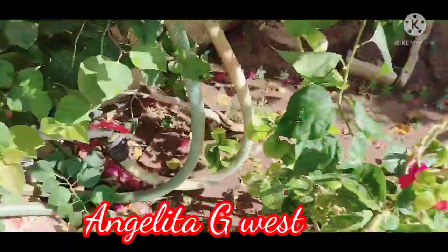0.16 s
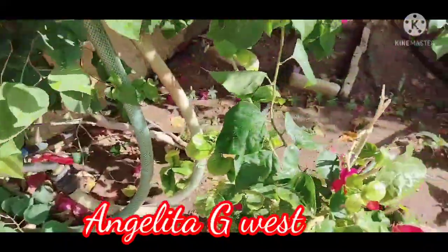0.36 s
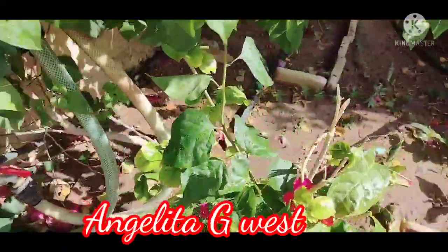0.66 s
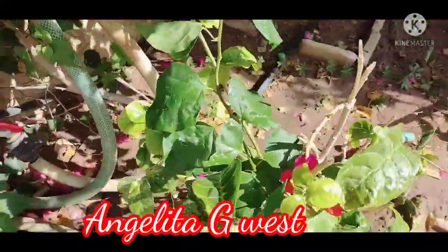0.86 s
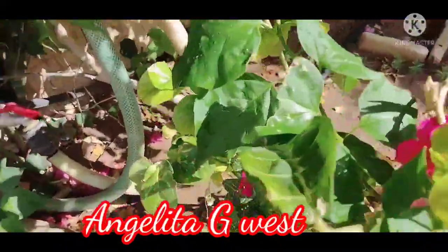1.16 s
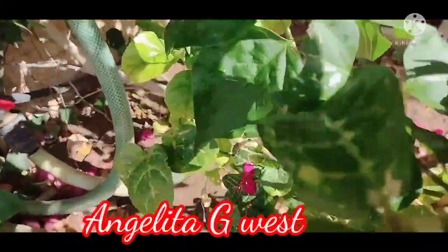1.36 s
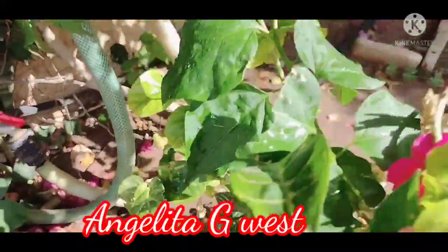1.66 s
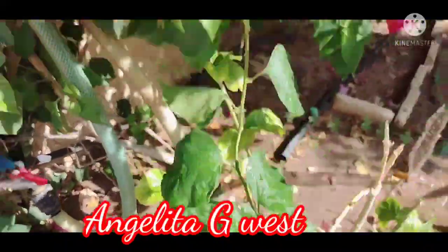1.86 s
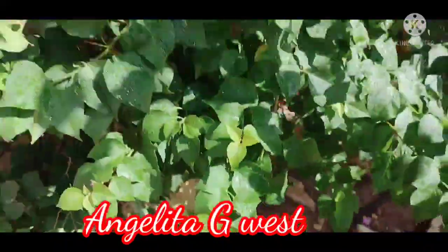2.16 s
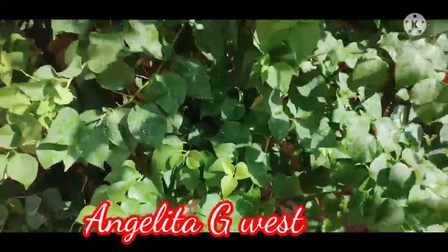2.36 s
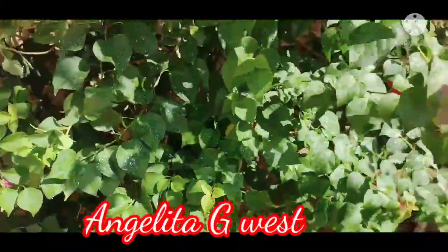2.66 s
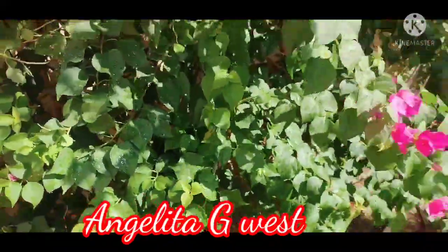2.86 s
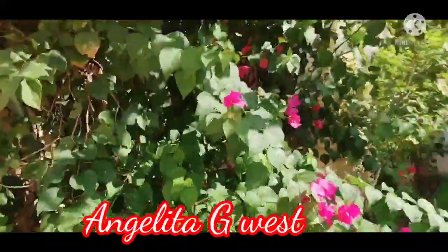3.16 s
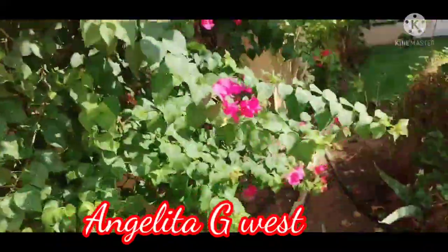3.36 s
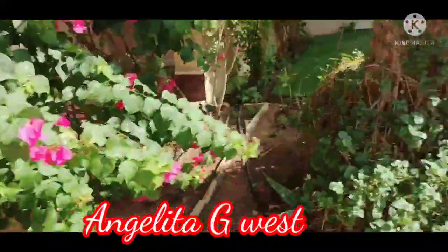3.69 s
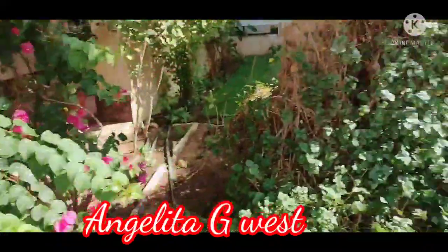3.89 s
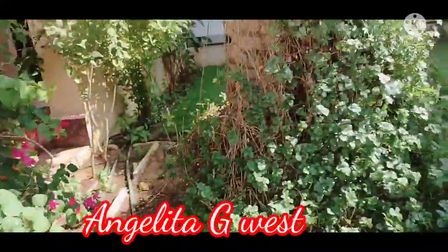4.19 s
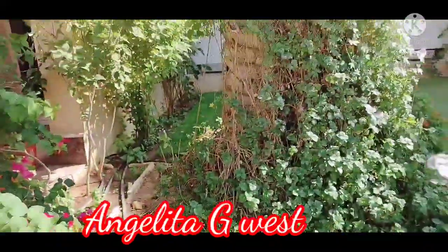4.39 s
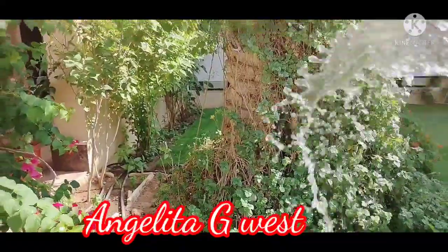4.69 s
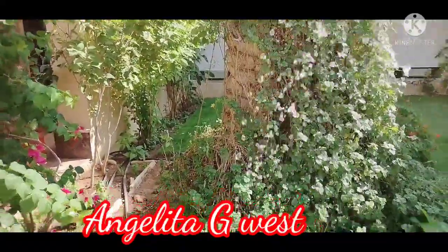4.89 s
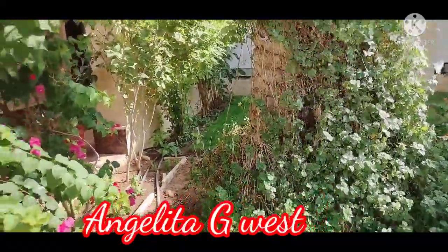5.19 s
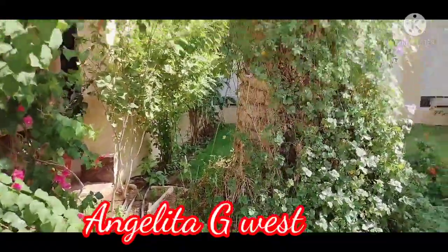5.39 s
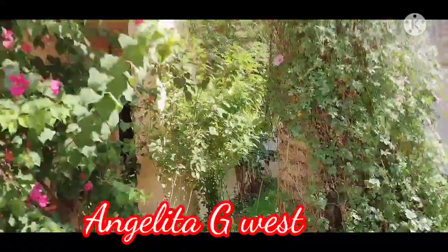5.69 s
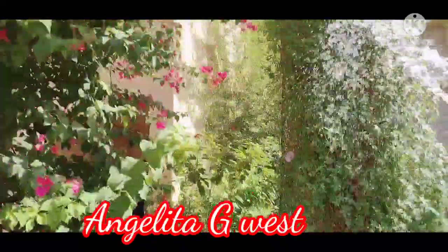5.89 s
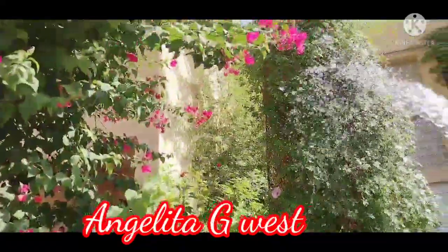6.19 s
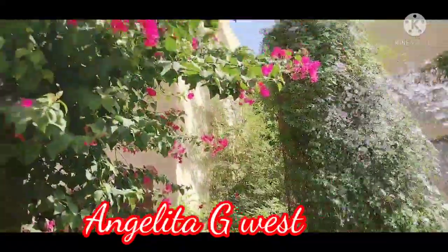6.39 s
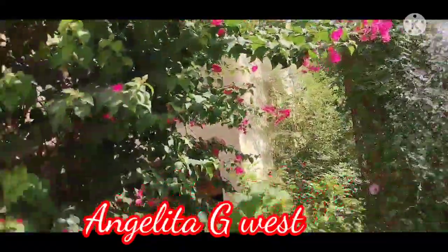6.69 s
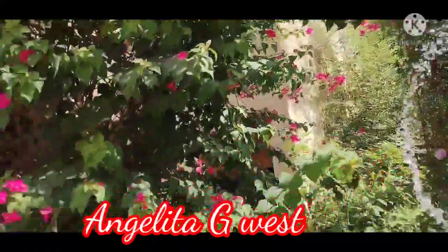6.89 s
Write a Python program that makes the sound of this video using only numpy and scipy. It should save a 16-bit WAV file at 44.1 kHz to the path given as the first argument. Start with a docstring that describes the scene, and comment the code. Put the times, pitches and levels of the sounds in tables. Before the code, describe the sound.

Outdoors in a garden, a faint squeaky slide and several dry knocks sound close to the microphone. Hose water then begins spitting onto nearby leaves, growing into a bright hiss with dense crackling splats and patter, over dull drumming on soil. The jet is strongest around the middle, then moves to a farther creeper, thinning to soft spray and sparse high ticks over a low outdoor rumble.

```python
"""Garden hose on shrubs

A hose is swept over shrubs: filtered random droplets hiss as fine spray and patter on leaves.
Slugs of water splat on near leaves as band-passed bursts; then the jet moves on to a creeper farther off.
At first something slides briefly (squealing resonances) and knocks a few times close by (filtered blows).
Low outdoor rumble, distant air and a faint hum (noise and wavering sines) lie underneath; a low drone joins late.
"""
import sys
import numpy as np
from scipy import signal
from scipy.fft import rfft, irfft, next_fast_len
from scipy.io import wavfile
from scipy.ndimage import map_coordinates

SR = 44100
rng = np.random.default_rng(int(sys.argv[2]) if len(sys.argv) > 2 else 0)


def transcribe(signal):
    """Save signal, clipped to [-1, 1], as a 16-bit WAV file at the path in sys.argv[1]."""
    frames = np.atleast_2d(signal).T
    limited = np.clip(frames, -1, 1)
    pcm = np.round(limited * 32767).astype(np.int16)
    wavfile.write(sys.argv[1], SR, pcm)


N = 310905
TIME = np.arange(N) / SR
CUTOFF_HZ = 15600


def from_db(db):
    """Decibels to gain."""
    return 10 ** (np.asarray(db) / 20)


def rms_one(x):
    """Scale to rms 1."""
    return x / np.sqrt(np.mean(x ** 2) + 1e-20)


def level_curve(rows):
    """Interpolate (t/s, level/dB) rows to every sample."""
    t_s, level_db = np.transpose(rows)
    return np.interp(TIME, t_s, level_db)


def noise():
    """White noise, rms 1."""
    return rng.standard_normal(N)


def sine(hz, phase=0):
    """Steady sine with an optional phase offset in rad."""
    return np.sin(2 * np.pi * hz * TIME + phase)


def drift(rate_hz):
    """Slow random curve of rms 1: noise through two equal one-pole low-passes, run at SR / 40."""
    step = 40
    r = np.exp(-2 * np.pi * rate_hz * step / SR)
    slow = signal.lfilter([1], [1, -2 * r, r * r], rng.standard_normal(N // step + 2002))
    slow = rms_one(slow[2000:])  # settled part
    return np.interp(np.arange(N) / step, np.arange(len(slow)), slow)


def coloured(x, spectrum):
    """Minimum-phase filter with the given relative spectrum; white input keeps its power."""
    size = 2 * next_fast_len(N // 2 + SR // 4)
    hz, db = np.transpose(spectrum)
    octave = np.log2(np.maximum(np.fft.rfftfreq(size, 1 / SR), 1))
    outside = np.abs(octave - np.clip(octave, np.log2(hz[0]), np.log2(hz[-1])))
    curve_db = np.interp(octave, np.log2(hz), db) - 18 * outside  # 18 dB/octave skirts
    gain = rms_one(from_db(curve_db))
    cepstrum = irfft(np.log(gain + 1e-6))
    cepstrum[1:size // 2] *= 2  # fold to causal
    cepstrum[size // 2 + 1:] = 0
    return irfft(rfft(x, size) * np.exp(rfft(cepstrum)))[:N]


def resonance(x, hz, width_hz):
    """Two-pole resonance; white input keeps its power."""
    r = np.exp(-np.pi * width_hz / SR)
    poles = [1, -2 * r * np.cos(2 * np.pi * hz / SR), r * r]
    return np.sqrt((1 - r * r) / 2) * signal.lfilter([1, 0, -1], poles, x + 1e-18)


def droplets(per_s, spread_db):
    """Random clicks, rms 1: many small, few large (negative spread: many large, few small)."""
    sizes = from_db(spread_db * np.minimum(rng.exponential(1, N), 3))
    hits = rng.random(N) < per_s / SR
    return rms_one(hits * sizes * rng.choice([-1, 1], N))


def clumps(per_s, spread_db, decay_s, steady):
    """Envelope of a jet in clumps: each lands at once and dies away, over a steady power share; rms 1."""
    hits = droplets(per_s, spread_db) ** 2
    power = signal.lfilter([1], [1, -np.exp(-2 / (decay_s * SR))], hits + 1e-18)
    steady = np.clip(steady, 0, 1)
    return np.sqrt(steady + (1 - steady) * power / power.mean())


def burst(age, decay_s, crack_db, crack_s):
    """Impact envelope: fast rise, short crack, slower decay."""
    body = np.exp(-age / max(decay_s, 1e-3))
    crack = from_db(crack_db) * np.exp(-age / crack_s)
    return (body + crack) * (1 - np.exp(-age / 0.00021))


def add(track, t_s, sound):
    """Mix a sound into a track at t_s."""
    at = max(round(t_s * SR), 0)
    track[at:at + len(sound)] += sound[:N - at]


def blend(far, near, nearness):
    """Equal-power cross-fade."""
    return np.sqrt(1 - nearness) * far + np.sqrt(nearness) * near


def speckled(x, speckle_db, rate_hz, count=11):
    """Splashing drops differ in size, so bands of the splash swell separately; rms 1."""
    edges_hz, out = np.geomspace(2200, 16000, count + 1), 0
    for k, band in enumerate(zip(edges_hz, edges_hz[1:])):
        part = signal.sosfilt(signal.butter(2, band, "band", fs=SR, output="sos"), x)
        out = out + (-1) ** k * part * from_db(speckle_db * drift(rate_hz))  # alternate polarity
    return rms_one(out)


# outdoor rumble before gain: t/s, level/dB
RUMBLE_LEVEL = [(0.0, -41.5), (0.35, -39.5), (0.41, -42), (1.33, -41.5), (1.98, -32), (2.04, -38.5),
                (2.92, -48.5), (4.16, -36.5), (4.22, -43.5), (5.32, -42.5), (5.73, -47), (7.05, -42)]
# rumble spectrum: f/Hz, relative density/dB
RUMBLE_SPECTRUM = [(11, -47), (18, 0.5), (76, 3), (124, -3.5), (171, -21.5), (220, -14.5), (290, -24),
                   (480, -120)]
RUMBLE_GAIN_DB = -3.5


def rumble():
    """Low-passed noise following a level curve."""
    return from_db(level_curve(RUMBLE_LEVEL) + RUMBLE_GAIN_DB) * coloured(noise(), RUMBLE_SPECTRUM)


# distant air spectrum: f/Hz, relative density/dB
AIR_SPECTRUM = [(82, -18.5), (140, 1), (210, -4.5), (384, -12.5), (477, -24.5), (705, -19), (2370, -34),
                (3500, -59), (4550, -63), (7700, -120)]
AIR_DB, AIR_WAVER_DB = -54, 2.1


def distant_air():
    """Coloured noise that swells and dips at random."""
    return from_db(AIR_DB + AIR_WAVER_DB * drift(4.4)) * coloured(noise(), AIR_SPECTRUM)


# faint far hum, mid-scene: f/Hz, level/dB
HUM_TONES = [(86, -79), (131, -59), (242, -67), (385, -65.5)]
HUM_WAVER_DB, HUM_RISE_DB_PER_S = 3, 0.57


def hum():
    """Sines wavering in level and phase, slowly growing."""
    total = np.zeros(N)
    rise_db = HUM_RISE_DB_PER_S * (TIME - TIME.mean())
    for hz, level_db in HUM_TONES:
        level = from_db(level_db + rise_db + HUM_WAVER_DB * drift(0.5))
        total += level * sine(hz, 1.21 * drift(0.92))
    return total


DRONE_S, DRONE_RISE_S, DRONE_HZ, DRONE_DB = 6.47, 0.12, 128.1, -48


def drone():
    """Late, far-off low sine with wandering phase."""
    fade_in = np.clip((TIME - DRONE_S) / DRONE_RISE_S, 0, 1)
    return from_db(DRONE_DB) * fade_in * sine(DRONE_HZ, 0.57 * drift(2.9))


# slide resonances before the pitch bend: f/Hz, width/Hz, relative level/dB
SLIDE_RESONANCES = [(1035, 50, -5), (1470, 50, -8), (1690, 61, -5), (2060, 80, -9), (2750, 360, 2),
                    (4500, 400, -9)]
SLIDE_DB, SLIDE_FADE_DB_PER_S = -56.5, 47
SLIDE_TOP_S, SLIDE_RISE_PER_S, SLIDE_SAG_PER_S = 0.023, 1.24, 0.4  # log-pitch slopes around the top
FRICTION_DB = 1.5  # ringing friction relative to squeal
SQUEAL_END_S, SQUEAL_RELEASE_S = .21, .14  # squeal dies before friction; times before the bend


def slide():
    """Friction makes narrow resonances squeal; pitch rises for a moment, then sags as the stroke slows."""
    bend = np.minimum(SLIDE_RISE_PER_S * (TIME - SLIDE_TOP_S), SLIDE_SAG_PER_S * (SLIDE_TOP_S - TIME))
    ratio = np.exp(bend + 0.0034 * drift(13))
    friction = noise()
    ringing, squeal = np.zeros((2, N))
    for hz, width_hz, db in SLIDE_RESONANCES:
        ringing += from_db(db) * resonance(friction, hz, width_hz)
        squeal += from_db(db + 2 * drift(14)) * sine(hz, .5 * drift(25))
    squeal_fade = np.clip((SQUEAL_END_S - TIME) / SQUEAL_RELEASE_S, 0, 1)
    unbent = rms_one(squeal) * squeal_fade + from_db(FRICTION_DB) * rms_one(ringing)
    stroke = map_coordinates(unbent, [np.cumsum(ratio)], order=1)  # variable-speed read
    return from_db(SLIDE_DB - SLIDE_FADE_DB_PER_S * TIME) * stroke


# knocks and scuffs close by: t/s, level/dB, contact cut-off f/Hz, rub decay/s
KNOCK_EVENTS = [(0.259, -40, 1890, 0.0038), (0.281, -49, 1900, 0.03), (0.33, -47.5, 2400, 0.019),
                (0.474, -30, 1400, 0.0011), (0.481, -30.5, 1420, 0.0024), (0.514, -41.5, 2100, 0.0056),
                (0.661, -34.5, 1030, 0.012), (0.728, -43.5, 3320, 0.013), (0.7484, -27, 2190, 0.004),
                (1.0506, -37, 2100, 0.0053), (1.0605, -38.5, 7040, 0.0053), (1.0627, -41, 6000, 0.0048),
                (1.076, -43.5, 3000, 0.023), (1.0841, -17.5, 3700, 0.0019), (1.421, -44, 1940, 0.0027)]
# knocked body spectrum: f/Hz, relative density/dB
KNOCK_BODY_SPECTRUM = [(300, 4), (600, 1), (800, -0.5), (1100, 4.5), (1380, 9), (1900, 7), (2800, 6.5),
                       (3600, 1.5), (5000, 0), (6200, 5.5)]
# bright scuffing edge spectrum: f/Hz, relative density/dB
KNOCK_EDGE_SPECTRUM = [(3000, -6), (5500, -12.5), (7500, -9), (8500, -5.5), (9400, -6), (10100, 1),
                       (11000, -5), (12500, -11), (15500, -19)]
EDGE_DB, EDGE_AT_HZ, EDGE_DB_PER_OCTAVE = -2.5, 3600, 8  # harder contact, stronger edge
RUB_RISE_S = 0.00063


def knocks():
    """Dry blows: a crack and a brief rub, duller for a soft contact, with a bright scuffing edge."""
    age = TIME[:SR // 10]
    force, edge = np.zeros((2, N))
    crack = from_db(14.5) * signal.unit_impulse(len(age))
    for t_s, body_db, contact_hz, decay_s in KNOCK_EVENTS:
        rub = rng.standard_normal(len(age)) * np.exp(-age / decay_s) * (1 - np.exp(-age / RUB_RISE_S))
        blow = signal.lfilter(*signal.butter(3, contact_hz, fs=SR), rub + crack)
        add(force, t_s + 0.00036, from_db(body_db) * blow)
        edge_db = body_db + EDGE_DB + EDGE_DB_PER_OCTAVE * np.log2(contact_hz / EDGE_AT_HZ)
        add(edge, t_s, from_db(edge_db) * burst(age, decay_s * 1.78, crack_db=-19.0, crack_s=0.00049))
    return coloured(force, KNOCK_BODY_SPECTRUM) + coloured(edge * noise(), KNOCK_EDGE_SPECTRUM)


# hollow bumps, all but the last under the knocks: t/s, initial f/Hz, level/dB, decay/s
BUMP_EVENTS = [(0.48, 990, -38, 0.0039), (0.514, 614, -46, 0.005), (0.73, 400, -46, 0.0071),
               (0.749, 388, -30, 0.0033), (1.051, 380, -33, 0.004), (1.0848, 383, -20, 0.0026),
               (2.612, 231, -30, 0.02)]
BUMP_SAG_PER_S = 8.5


def bumps():
    """Soft decaying sines; pitch sinks as the contact relaxes."""
    total = np.zeros(N)
    for t_s, hz, level_db, decay_s in BUMP_EVENTS:
        age = np.maximum(TIME - t_s, 0)
        cycles = hz * (1 - np.exp(-BUMP_SAG_PER_S * age)) / BUMP_SAG_PER_S
        envelope = np.exp(-age / decay_s) * (1 - np.exp(-age / 0.00065))
        total += from_db(level_db) * np.sin(2 * np.pi * cycles) * envelope
    return total


# water drumming on soil before gain: t/s, level/dB
SOIL_LEVEL = [(0.0, -55.5), (0.7, -59.5), (1.8, -54.5), (2.35, -58), (2.83, -49), (3.3, -55.5),
              (3.73, -53.5), (5.5, -57), (7.05, -53.5)]
# soil spectrum: f/Hz, relative density/dB
SOIL_SPECTRUM = [(190, -15.5), (270, 5.5), (420, 4.5), (650, -2), (800, -5.5), (1000, -8.5), (1600, -13.5)]
SOIL_GAIN_DB = -0.5


def soil(landing):
    """Dull droplets on soil, partly following the clumps of the jet."""
    drumming = coloured(droplets(per_s=2500, spread_db=-3.5), SOIL_SPECTRUM)
    return from_db(level_curve(SOIL_LEVEL) + SOIL_GAIN_DB) * drumming * np.sqrt(landing)


# fine spray of the wandering jet before surges and gain: t/s, level/dB
JET_LEVEL = [(0.0, -59), (0.31, -69.5), (0.45, -69), (1.45, -55.5), (1.67, -47.5), (1.92, -46.5),
             (2.32, -45), (2.55, -41.5), (3.1, -39), (3.22, -37), (3.59, -39), (3.83, -31.5), (4.83, -35),
             (5.03, -40), (5.46, -47.5), (5.79, -47.5), (6.34, -43), (7.05, -49.5)]
# swell on a bunch of leaves, or thinning in a gap: t/s, length/s, spray change/dB, patter change/dB
JET_SURGES = [(0.265, 0.28, 11.5, 19), (0.56, 0.043, 7, -7), (0.64, 0.31, 7, 9), (1.475, 0.21, -7.5, -5),
              (1.75, 0.13, 4, 11.5), (1.876, 0.14, 7, 14), (2.035, 0.031, -4, 5.5),
              (2.217, 0.092, -1.5, -7), (2.686, 0.075, 5, 12), (2.977, 0.063, -0.5, 8),
              (3.048, 0.047, -2, 2.5), (3.104, 0.41, 2, 2), (3.433, 0.12, -2.5, -4.5), (3.59, 0.11, 1.5, 5),
              (3.715, 0.023, -0.5, 0), (4.201, 0.046, -1.5, 7.5), (4.377, 0.12, 4, 3.5),
              (4.545, 0.088, 1.5, -2.5), (4.633, 0.056, 3.5, 1), (4.882, 0.12, 6.5, 9),
              (5.015, 0.071, -0.5, 3), (5.252, 0.11, 5, 4), (5.45, 0.46, -2, -21)]
SURGE_ATTACK_S, SURGE_RELEASE_S = .012, .018
SPRAY_GAIN_DB = -0.14
PATTER_DB, DRIP_DB = -13, -64  # patter re spray curve; wet leaves drip on at their own level


def jet():
    """Spray and patter levels in dB: patter follows spray, each with its own surge depth."""
    spray_db = level_curve(JET_LEVEL)
    patter_db = spray_db + PATTER_DB
    for t_s, length_s, spray_lift_db, patter_lift_db in JET_SURGES:
        attack = (TIME - t_s) / SURGE_ATTACK_S
        release = 1 + (t_s + length_s - TIME) / SURGE_RELEASE_S
        swell = np.clip(np.minimum(attack, release), 0, 1)
        spray_db = spray_db + spray_lift_db * swell
        patter_db = patter_db + patter_lift_db * swell
    with_drip = np.hypot(from_db(patter_db), from_db(DRIP_DB))
    return spray_db + SPRAY_GAIN_DB, 20 * np.log10(with_drip)


# far spray spectrum: f/Hz, relative density/dB
FAR_SPRAY_SPECTRUM = [(1760, -69), (3000, -58), (3490, -10), (6090, -6.5), (10200, 8), (11400, 7),
                      (14900, -5), (15500, 2)]
# splash spectrum, near spray and slugs: f/Hz, relative density/dB
SPLASH_SPECTRUM = [(1760, -32.5), (3000, -14), (5880, -6.5), (10500, 4.5), (14900, -8), (15500, -5.5)]


def spray(spray_db, landing, nearness):
    """Tiny droplets on foliage: far off they merge to a hiss, near by they crackle in clumps."""
    far_clumps = clumps(per_s=2300, spread_db=-21.0, decay_s=0.0043, steady=0.27)
    far_hiss = coloured(droplets(per_s=16000, spread_db=1.5) * far_clumps, FAR_SPRAY_SPECTRUM)
    crackle = coloured(droplets(per_s=12000, spread_db=5.0) * landing, SPLASH_SPECTRUM)
    far = speckled(far_hiss, speckle_db=2.0, rate_hz=55)
    near = speckled(crackle, speckle_db=3.5, rate_hz=30)
    return from_db(spray_db) * blend(far, near, nearness)


# leaf tap spectrum, filters the ringing leaves: f/Hz, relative gain/dB
PATTER_SPECTRUM = [(250, 25), (600, -27.5), (1000, -2), (1600, 0), (3000, 1), (5000, 1), (8000, -2),
                   (13000, -9)]
LEAF_SWELL_DB = 3.5  # jet wanders from leaf to leaf


def leaf_taps(per_s, spread_db, width_share, count=30):
    """Drops dealt to leaves of many pitches; each rings a few cycles and swells separately; rms 1."""
    clicks, leaf = droplets(per_s, spread_db), rng.integers(0, count, N)
    taps = np.zeros(N)
    for k, hz in enumerate(np.geomspace(800, 9000, count)):
        ringing = resonance(clicks * (leaf == k), hz, hz * width_share)
        taps += np.sqrt(hz) * ringing * from_db(LEAF_SWELL_DB * drift(9.3))
    return rms_one(coloured(taps, PATTER_SPECTRUM))


NEAR_TAPS_DB = -0.5  # re patter


def patter(patter_db, landing, nearness):
    """Larger drops: dry taps in clumps on near leaves, an even wash on far ones."""
    taps = leaf_taps(per_s=2600, spread_db=4.5, width_share=0.055) * landing
    wash = leaf_taps(per_s=9000, spread_db=3.5, width_share=0.16)
    return from_db(patter_db) * blend(wash, from_db(NEAR_TAPS_DB) * taps, nearness)


SPRINKLE_S, SPRINKLE_LENGTH_S, SPRINKLE_PER_S = 5.42, .52, 72
SPRINKLE_DB, SPRINKLE_SPREAD_DB = -45.5, 11.5  # slap before SLAP_DB
SPRINKLE_SPLASH_DB = -6  # splash re slap, before gains
SPRINKLE_HZ, SPRINKLE_OCTAVES, SPRINKLE_DECAY_S = 10300, 0.13, 0.0027


def sprinkle():
    """In the lull, single drops tick high and thin on the far creeper; rows as in SLUGS."""
    when, size, pitch = rng.random((int(SPRINKLE_PER_S * SPRINKLE_LENGTH_S), 3)).T
    t_s = SPRINKLE_S + SPRINKLE_LENGTH_S * when
    slap_db = SPRINKLE_DB + SPRINKLE_SPREAD_DB * (2 * size - 1)
    hz = np.minimum(SPRINKLE_HZ * 2 ** (SPRINKLE_OCTAVES * (2 * pitch - 1)), CUTOFF_HZ)
    decay_s = np.full(len(hz), SPRINKLE_DECAY_S)
    return np.transpose([t_s, slap_db + SPRINKLE_SPLASH_DB, slap_db, hz, decay_s])


STRAYS_PER_S, STRAY_SPREAD_DB = 45, 4.5  # candidate rate; kept by nearness
STRAY_PEAK_DB, STRAY_SLAP_DB = 8, -11.5  # re spray, before gains
STRAY_HZ, STRAY_OCTAVES, STRAY_DECAY_S = 3800, 1.3, 0.0027


def strays(spray_db, nearness):
    """Small slugs break off at random, more while the jet lands near, scaled to the spray; rows as in SLUGS."""
    when, luck, size, slap, pitch = rng.random((int(STRAYS_PER_S * N / SR), 5)).T
    at = (when * N).astype(int)
    level_db = spray_db[at] + STRAY_SPREAD_DB * (2 * size - 1)
    slap_db = level_db + STRAY_SLAP_DB + STRAY_SPREAD_DB * (2 * slap - 1)
    hz = STRAY_HZ * 2 ** (STRAY_OCTAVES * (2 * pitch - 1))
    decay_s = np.full(len(at), STRAY_DECAY_S)
    rows = np.transpose([TIME[at], level_db + STRAY_PEAK_DB, slap_db, hz, decay_s])
    return rows[luck < nearness[at]]


GAP_S, GAP_FROM_DB = 0.054, -11
GAP_DEEPENS = 0.57  # dB of dip per dB of slug above GAP_FROM_DB


def gaps():
    """Water gathers into each large slug, so the jet thins just before it lands; change in dB."""
    age = TIME[:SR // 20]
    dip = np.clip(np.minimum(2 * age / GAP_S, 1 + (GAP_S - age) / 0.0063), 0, 1)
    thinning_db = np.zeros(N)
    for t_s, peak_db, *_ in SLUGS:
        add(thinning_db, t_s - GAP_S, GAP_DEEPENS * max(peak_db - GAP_FROM_DB, 0) * dip)
    return -thinning_db


# slugs hitting leaves, levels before gains: t/s, splash level/dB, slap level/dB, leaf f/Hz, decay/s
SLUGS = [(1.29, -43, -46, 6950, .008), (1.632, -29.5, -45.5, 2280, 0.011), (1.766, -39, -42, 1900, .005),
         (1.812, -20, -50, 4600, .003), (1.814, -10.5, -42, 4680, 0.0068), (1.860, -26, -34, 4530, 0.0065),
         (1.893, -17, -40, 2460, 0.0062), (1.945, -23, -35.5, 2170, 0.0042),
         (1.977, -18.5, -36, 4500, 0.0038), (1.993, -11.5, -54, 6000, 0.00091),
         (2.327, -40, -43, 3930, .004), (2.348, -16, -53, 6900, 0.00086), (2.354, -17, -45, 3000, 0.0044),
         (2.370, -21, -48, 1900, 0.0033), (2.4071, -21, -37.5, 2780, 0.0077),
         (2.4412, -18.5, -33, 6000, 0.0044), (2.4527, -15.5, -31.5, 2950, 0.0051),
         (2.4795, -8.5, -37, 2320, 0.0029), (2.4998, -20, -28.5, 5260, 0.0067),
         (2.5506, -17.5, -34.5, 3880, 0.017), (2.605, -24, -33.5, 2650, 0.0042),
         (2.683, -29, -38.5, 7000, .003), (2.6922, -13, -28.5, 2980, 0.013), (2.72, -27, -32, 3020, 0.0036),
         (2.734, -10.5, -29.5, 3270, 0.014), (2.766, -18, -50, 5000, 0.011),
         (2.797, -14, -41, 2820, 0.0051), (2.8225, -16, -43, 4000, 0.0011),
         (2.8469, -15.5, -52, 4230, 0.0073), (2.8651, -12, -33, 4200, 0.0076),
         (2.9557, -10.5, -36.5, 2400, 0.0057), (2.9999, -12, -31, 3280, 0.015),
         (3.112, -17.5, -39, 4800, .008), (3.139, -13.5, -39, 3600, 0.0041), (3.15, -34, -34, 2580, 0.0061),
         (3.165, -16, -38, 3600, 0.0043), (3.1913, -17, -29, 2930, 0.0073),
         (3.2033, -14, -24.5, 2750, 0.0087), (3.2492, -17.5, -37, 3580, 0.014),
         (3.293, -13.5, -41, 4500, 0.0036), (3.330, -16, -38, 4000, 0.0038),
         (3.348, -16, -34, 4480, 0.0022), (3.363, -27, -32, 3100, 0.0037),
         (3.381, -8.5, -44.5, 7000, 0.0012), (3.402, -14.5, -31, 3540, .005),
         (3.409, -15, -41, 3940, 0.014), (3.525, -14.5, -38, 4400, 0.0054),
         (3.5623, -15.5, -38, 4500, 0.0053), (3.591, -16.5, -36, 3840, 0.018),
         (3.618, -17, -24.5, 2740, 0.004), (3.6425, -19, -22.5, 3020, 0.004),
         (3.649, -19, -28, 2740, 0.0037), (3.6649, -13, -25, 2300, 0.0058),
         (3.673, -11.5, -30.5, 2480, 0.0043), (3.6886, -13.5, -29, 3800, 0.013),
         (3.7527, -15, -31.5, 3820, 0.022), (3.781, -9.5, -25.5, 5850, 0.0021),
         (3.801, -23.5, -30, 3800, 0.013), (3.853, -17, -53.5, 4500, 0.0049),
         (3.886, -7, -47, 6050, 0.00081), (3.9156, -17.5, -37, 3530, 0.0053), (3.953, -14, -43, 6500, 0.01),
         (4.032, -17, -29.5, 3070, 0.0024), (4.04, -11.5, -29, 2900, 0.0073),
         (4.067, -10.5, -37, 4360, 0.0047), (4.2138, -16, -33, 1720, 0.0061),
         (4.217, -17.5, -28, 4460, 0.0048), (4.236, -16, -31.5, 4570, 0.0044),
         (4.261, -12, -44.5, 5000, 0.0016), (4.2823, -6, -41, 4630, 0.00094),
         (4.3157, -9, -28, 5900, 0.0027), (4.357, -2.5, -28, 1740, 0.002), (4.369, -12, -34, 1780, .003),
         (4.3669, -9.5, -29.5, 4830, 0.0031), (4.399, -17.5, -26, 5180, 0.003),
         (4.423, -17, -30, 4800, 0.011), (4.533, -15, -33, 3800, 0.0013), (4.674, -22, -30, 2930, 0.0065),
         (4.694, -15, -29.5, 3360, 0.0037), (4.707, -11, -33, 3400, 0.0022), (4.734, -13, -33, 3856, 0.011),
         (4.786, -15.5, -27, 7000, 0.0042), (4.7945, -13, -44, 4870, 0.0042),
         (4.8172, -12, -36, 2840, 0.0028), (4.830, -10, -39.5, 3480, .003),
         (4.863, -10.5, -50, 5000, 0.0015), (4.885, -15, -30, 2130, .005), (4.900, -18, -30, 4360, 0.0046),
         (4.94, -6.5, -32, 4380, 0.002), (4.9618, -11.5, -24.5, 4570, 0.0041),
         (4.996, -12, -37, 3800, 0.0025), (5.126, -23, -52.5, 6000, 0.0049), (5.546, -28, -46, 5920, .003),
         (5.6049, -27, -43, 5600, 0.0019), (5.672, -35, -47.5, 5920, 0.003),
         (5.706, -41.5, -40.5, 8050, 0.0048), (5.755, -29.5, -52, 6000, 0.003),
         (5.874, -16.5, -45, 4680, 0.0012), (6.205, -40, -37, 7500, 0.0067)]
SHOWER_DB, SLAP_DB = -10, -8.5  # gains
CRACK_DB = 20  # first touch re rush
REBOUND, REBOUND_S = 0.36, .0013  # share, mean delay
SLAP_WIDTH_HZ = 2760  # at STRAY_HZ; grows as sqrt(f), at most 0.9 f
RING_DB, RING_WIDTH_SHARE = -7.5, .09
FLAP_DB, FLAP_HZ = 2.5, 990  # low-passed push
PLIP_DB, PLIP_OCTAVES = -7, 0.63  # drops after a slug: level re table slap, pitch spread


def splats(slugs, count=4):
    """A slug cracks on a leaf, whose rebound bands the sound; drops follow, and all bursts into a shower."""
    age = TIME[:SR // 16]
    shower_power, slaps, flaps = np.zeros((3, N))
    grit = coloured(droplets(per_s=13000, spread_db=-3.5), SPLASH_SPECTRUM)
    grit = speckled(grit, speckle_db=1.0, rate_hz=27)
    crack = from_db(CRACK_DB) * signal.unit_impulse(len(age))
    for t_s, peak_db, slap_db, hz, decay_s in slugs:
        splash = from_db(peak_db + SHOWER_DB) * burst(age, decay_s, crack_db=-7.0, crack_s=0.00013)
        add(shower_power, t_s, splash ** 2)

        rush = rng.standard_normal(len(age)) * np.exp(-age / decay_s)
        push = from_db(slap_db + SLAP_DB) * (crack + rush)
        delay_s = REBOUND_S * (.5 + rng.random())
        push = push - REBOUND * np.interp(age - delay_s, age, push, left=0)
        add(flaps, t_s, push)

        width_hz = min(SLAP_WIDTH_HZ * np.sqrt(hz / STRAY_HZ), 0.9 * hz)
        leaf = signal.butter(2, [hz - width_hz / 2, hz + width_hz / 2], "band", fs=SR)
        slap = np.sqrt(SR / 2 / width_hz) * signal.lfilter(*leaf, push)
        ring = from_db(RING_DB) * resonance(push, hz, RING_WIDTH_SHARE * hz)
        add(slaps, t_s, slap + ring)

        for wait, detune, size in rng.random((count, 3)):
            cycles = hz * 2 ** (PLIP_OCTAVES * (2 * detune - 1)) * age
            plip = np.sin(2 * np.pi * cycles) * np.exp(-cycles / 4)
            plip_db = slap_db + PLIP_DB - 2.0 * wait - 4.4 * size
            add(slaps, t_s + 3.8 * decay_s * wait, from_db(plip_db) * plip)
    flap = from_db(FLAP_DB) * signal.lfilter(*signal.butter(2, FLAP_HZ, fs=SR), flaps)
    return np.sqrt(shower_power) * grit + slaps + flap


FAR_DB, NEAR_DB = -48, -33.5  # spray levels of a far and a near landing


def scene():
    """Sum all layers; near spray, near taps and soil share the same clumps of water."""
    background = rumble() + distant_air() + hum() + drone()
    handling = slide() + knocks() + bumps()
    spray_db, patter_db = jet()
    nearness = np.clip((spray_db - FAR_DB) / (NEAR_DB - FAR_DB), .02, .95)  # louder spray lands nearer
    landing = clumps(per_s=350, spread_db=5.5, decay_s=0.0055, steady=0.52)
    thinning_db = gaps()
    spray_db, patter_db = spray_db + thinning_db, patter_db + thinning_db
    water = soil(landing) + spray(spray_db, landing, nearness) + patter(patter_db, landing, nearness)
    slugs = [*SLUGS, *strays(spray_db, nearness), *sprinkle()]
    return (background + handling + water + splats(slugs))[None]


def record(dry):
    """Steep elliptic low-pass at CUTOFF_HZ."""
    return signal.sosfilt(signal.ellip(12, .1, 80, CUTOFF_HZ, fs=SR, output="sos"), dry)


dry = scene()
out = record(dry)
transcribe(out)
```